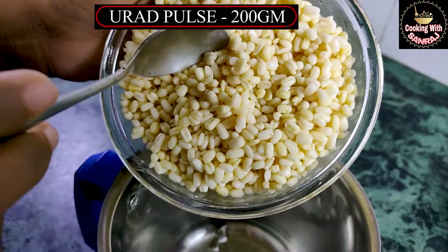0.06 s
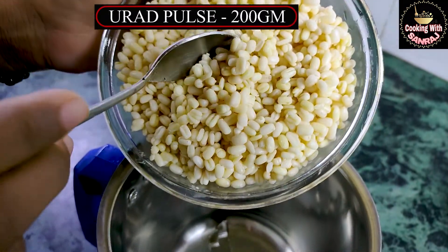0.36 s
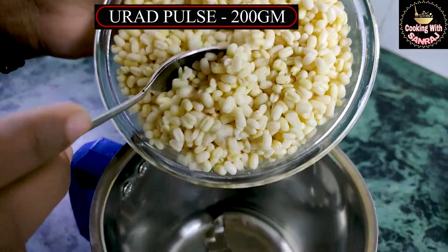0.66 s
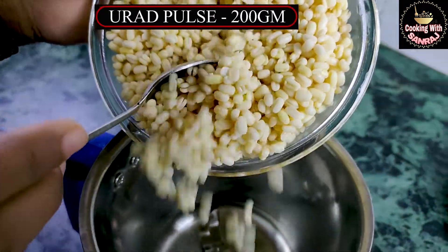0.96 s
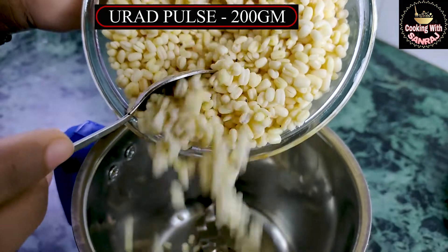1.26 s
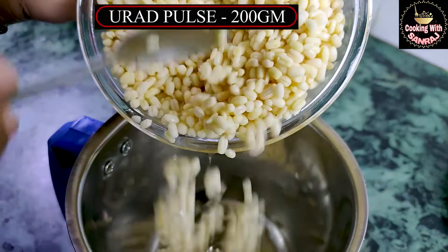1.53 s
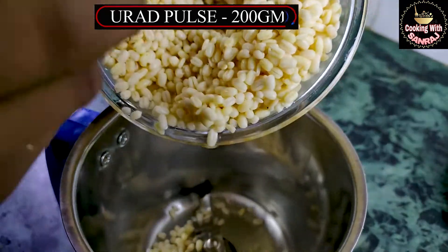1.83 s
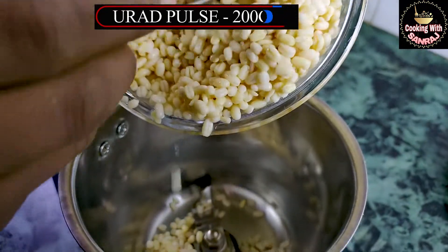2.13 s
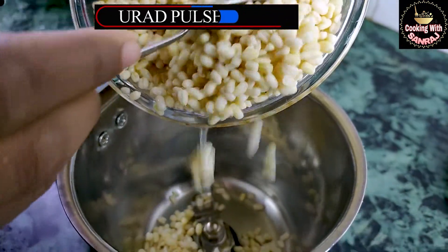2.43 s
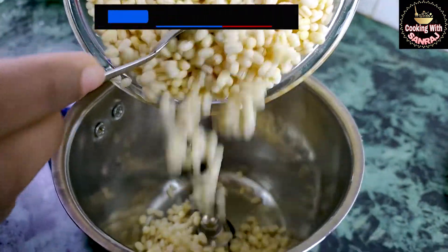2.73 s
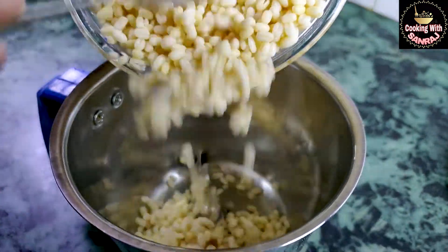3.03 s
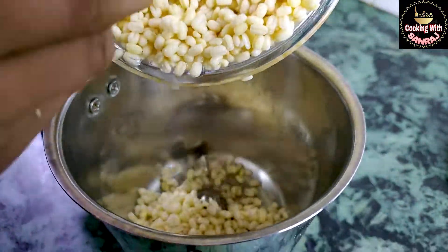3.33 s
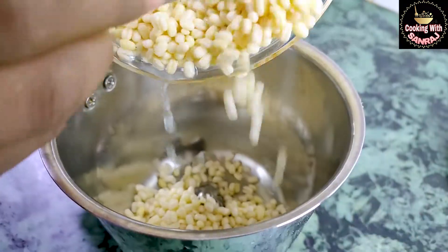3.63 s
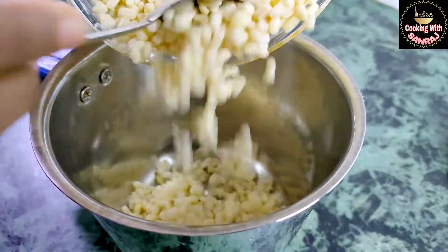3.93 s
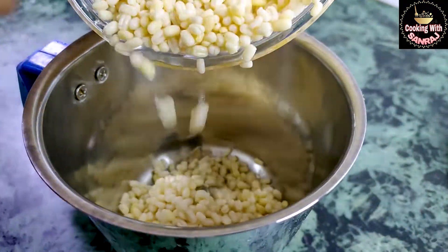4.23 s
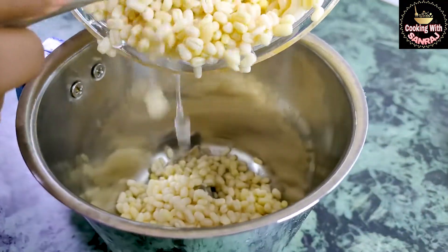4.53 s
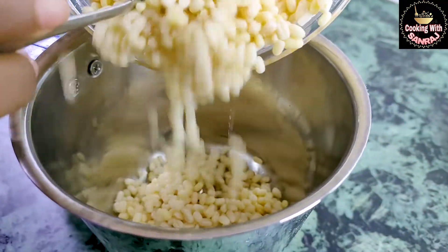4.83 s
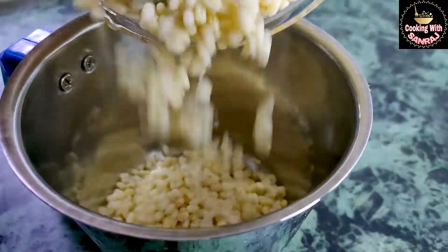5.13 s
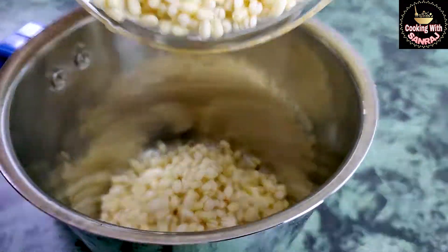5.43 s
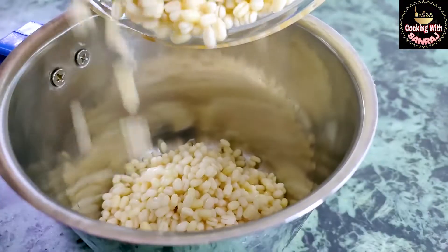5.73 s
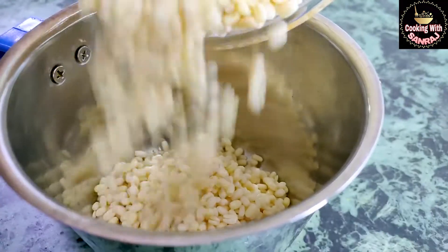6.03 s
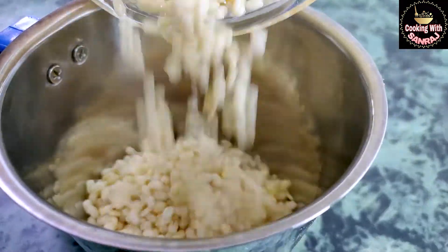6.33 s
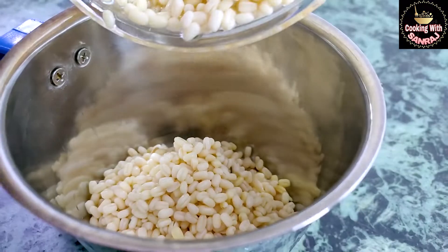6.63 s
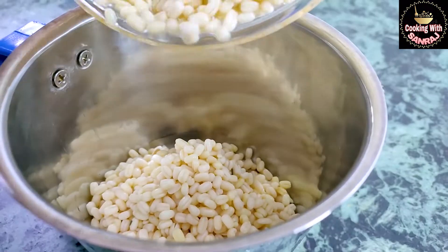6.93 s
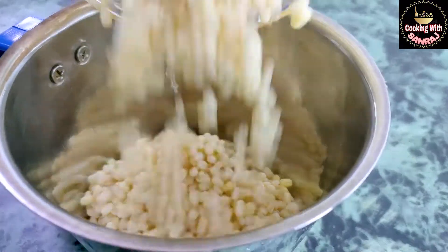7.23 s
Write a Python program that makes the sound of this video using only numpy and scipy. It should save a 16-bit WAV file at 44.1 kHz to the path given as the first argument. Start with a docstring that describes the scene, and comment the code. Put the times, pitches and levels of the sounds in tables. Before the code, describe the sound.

Heard close up in a small, quiet kitchen with a faint low hum, hands softly rub the vessels and bump a glass bowl. From about 0.9 to 1.7 seconds, wet lentils drop in clumps into a steel jar, pattering, ticking and pinging on the bare metal, with dull ringing knocks up to 2 seconds. A softer spoonful falls from 2.5 seconds. At 3.3 seconds a spoon clinks sharply on the bowl, the loudest sound, followed by a faint falling squeak. More short bursts of wet patter come around 4, 5 and 6 seconds, ringing less as the lentils land on a heap. Two firm, short knocks on the jar sound at 5.3 and 5.8 seconds. A softer clink comes at 6.5 seconds, then the bowl clacks on the jar's rim at 6.6. A last few lentils fall at about 7.2 seconds.

```python
"""Soaked lentils are spooned from a glass bowl into a steel grinder jar in a small, quiet kitchen.
Hands rub and shift the vessels and bump the bowl. From 0.9 s, spoonfuls trickle and drop in clumps,
pattering and pinging on bare steel; clumps and nudges knock the jar. From 1.5 to 4 s a heap covers the
floor and damps the ring. The spoon clinks on the bowl at 3.3 s; a faint squeak follows. More spoonfuls,
knocks and softer clinks come; at 6.6 s the bowl clacks on the jar's rim, then a last few lentils fall."""
import sys
import numpy as np
from scipy import signal
from scipy.fft import rfft, irfft, next_fast_len
from scipy.io import wavfile
from scipy.ndimage import uniform_filter1d

SR = 44100
rng = np.random.default_rng(int(sys.argv[2]) if len(sys.argv) > 2 else 0)


def dump(signal):
    """Clip the signal to [-1, 1] and save it as 16-bit WAV at the path in sys.argv[1]."""
    limited = np.clip(np.atleast_2d(signal).T, -1, 1)
    pcm = np.round(limited * 32767).astype(np.int16)
    wavfile.write(sys.argv[1], SR, pcm)


N = 320210
TIME_S = np.arange(N) / SR
RING_S = np.arange(SR // 2) / SR
TOP_HZ = 7800

# room noise spectrum: freq_hz, density_db
AIR_SPECTRUM = [(8, -11.5), (18, 5.5), (32, -9.5), (50, -15), (60, -8), (90, -28.5), (170, -19),
                (250, -26.5), (550, -24), (800, -35), (1300, -37.5), (1800, -44.5), (7500, -52.5),
                (10000, -67.5)]
# kitchen reverberation: freq_hz, t60_s
KITCHEN_DECAY = [(200, .25), (800, .23), (2600, .235), (5000, .19), (8000, .145)]
# hands and vessels rubbing: start_s, length_s, centre_hz, level_db
RUBS = [(0.0, 0.058, 540, -51.5), (0.0, 0.072, 1180, -56.5), (0.771, 0.19, 159, -57),
        (0.852, 0.24, 1075, -59), (1.038, 0.19, 19.8, -44.5), (1.536, 0.18, 485, -45.5),
        (1.558, 0.14, 187, -61), (1.709, 0.32, 1300, -64), (1.755, 0.25, 652, -61), (1.867, 0.25, 510, -54),
        (1.97, 0.17, 136.4, -62), (4.574, 0.13, 333, -61.5), (4.575, 0.17, 1042, -70),
        (4.716, 0.12, 480, -55.5), (4.859, 0.12, 4020, -66), (4.916, 0.14, 1015, -66.5),
        (5.52, 0.18, 317, -60.5)]
# hand on bowl: start_s, level_db
BUMPS = [(0.613, -45)]
# modes of that bump: pitch_hz, level_db, t60_s
BUMP_MODES = [(300, -15.5, 0.074), (494, 5, 0.024), (560, -1, 0.021), (618, -14.5, 0.094)]
# jar floor under lentils: time_s, covered_fraction
FLOOR_COVER = [(1.5, 0), (2.8, 0.76), (4.0, 1), (5.0, 1)]
# landing on bare steel: freq_hz, density_db
STEEL_SPECTRUM = [(300, -39.5), (520, -20), (680, 17), (800, -12), (900, -0.5), (1080, -9), (1750, -12.5),
                  (2020, 1.5), (2400, -4.5), (3000, -5.5), (3350, -10), (4500, -3), (6000, 2), (8000, -14)]
# landing on the heap: freq_hz, density_db
HEAP_SPECTRUM = [(300, -31.5), (550, -26), (770, -10), (1000, -19.5), (1400, -30.5), (1700, -15), (2020, 3),
                 (2250, -4.5), (2700, -2), (3050, -9.5), (3400, -26), (3750, -5.5), (4200, 6.5), (5300, 2),
                 (7300, 1), (8000, -10)]
# thin steel wall: pitch_hz, level_db, t60_s
WALL_MODES = [(2015, -6, .04), (3000, -5, .04), (4215, -4, .05), (4665, -4, .045), (5650, -5, .04),
              (6880, -6, .05), (7260, -6, .05), (7550, -6, .05)]
# loose lentils from each spoonful: start_s, end_s, patter_db, crackle_db
TRICKLES = [(1.07, 1.692, -60, -62), (2.673, 3.296, -72.5, -70), (3.83, 4.21, -73.5, -68),
            (4.867, 5.349, -67, -79.5), (5.771, 6.462, -70.5, -68.5), (7.193, 7.26, -66.5, -63)]
# clumps landing: peak_s, build_up_s, patter_db, crackle_db
CLUMPS = [(0.939, 0.0049, -52.5, -67.5), (1.069, 0.0082, -51, -58.5), (1.087, 0.0017, -48.5, -41.5),
          (1.134, .025, -49.5, -49.5), (1.153, .005, -47.5, -39), (1.283, 0.0039, -52, -51.5),
          (1.336, 0.013, -50.5, -51.5), (1.38, 0.023, -49, -51.5), (1.412, 0.032, -46.5, -50),
          (1.556, 0.0041, -46.5, -48), (1.615, 0.016, -45.5, -45), (2.54, 0.013, -65.5, -70.5),
          (2.67, 0.007, -61, -63.5), (2.70, 0.025, -53.5, -58), (2.77, 0.046, -61.5, -60.5),
          (2.885, .012, -65.5, -56.5), (3.03, 0.059, -61, -59.5), (3.086, 0.038, -61, -59),
          (3.186, 0.03, -56.5, -52.5), (3.305, 0.017, -54, -55), (3.836, 0.011, -67.5, -60.5),
          (3.945, 0.029, -54, -60), (4.053, 0.0045, -61.5, -61), (4.176, 0.0068, -75.5, -60),
          (4.315, 0.007, -74, -103), (4.405, .012, -88, -80), (4.819, 0.014, -70, -69),
          (4.866, 0.0043, -60.5, -90), (5.105, 0.0077, -83, -53), (5.122, 0.0056, -54.5, -55.5),
          (5.15, .004, -68, -55.5), (5.282, 0.025, -57.5, -53), (5.33, 0.03, -55, -53),
          (5.404, .004, -98, -63.5), (5.839, .005, -58.5, -63), (5.955, 0.0091, -58.5, -49.5),
          (6.075, 0.014, -89, -53), (6.176, 0.03, -64, -56), (6.215, 0.0078, -69, -55.5),
          (6.308, .004, -75, -48.5), (6.345, 0.011, -56.5, -49.5), (7.21, 0.021, -68, -58),
          (7.255, 0.0014, -58.5, -39.5)]
# single hard landings: start_s, level_db
TICKS = [(0.9372, -26), (1.0859, -25), (1.1513, -18.5), (1.189, -29), (1.2819, -25), (1.3573, -34),
         (1.5461, -26), (2.7, -40.5), (2.8798, -39.5), (3.2573, -37), (3.8344, -37.5), (4.0008, -41),
         (6.0203, -41.5), (6.303, -42), (6.34, -30), (7.1941, -40)]
# lentils striking bare steel: start_s, level_db, pitch_hz, t60_s
PINGS = [(0.942, -57, 5720, 0.033), (1.066, -40, 5630, 0.032), (1.374, -42, 5670, 0.049),
         (1.66, -58, 4187, 0.18), (6.215, -50, 4214, 0.086), (6.34, -45.5, 4610, 0.14)]
# dull blows on the jar: start_s, level_db, focus_hz, cutoff_hz
KNOCKS = [(0.946, -36, 684, 830), (1.064, -37.5, 706, 850), (1.29, -52.5, 690, 900),
          (1.372, -36.5, 654, 784), (1.405, -32.5, 645, 910), (1.61, -30, 680, 1026),
          (1.761, -47, 847, 1203), (1.923, -30.5, 610, 1670), (1.957, -41, 632, 1656),
          (2.54, -52.5, 880, 1220), (2.696, -42, 760, 1200), (2.766, -30.5, 1307, 2190),
          (2.805, -40, 1120, 1900), (3.184, -23.5, 566, 1620), (3.394, -31, 896, 1410),
          (3.564, -38, 800, 880), (3.861, -49, 893, 940), (3.942, -43, 646, 915), (4.051, -42, 880, 955),
          (5.3225, -15, 777, 894), (5.8329, -18, 798, 900), (6.482, -42, 790, 752)]
# gentler blows build more slowly: level_db, attack_s
KNOCK_ATTACK = [(-53, 0.01), (-32.5, .002), (-18.5, 0.00068)]
# steel jar: pitch_hz, level_db, t60_s
JAR_MODES = [(662, -1, .12), (709, 0, .13), (765, -1, .13), (808, -10, .13), (895, 1, .1), (945, -6, .05),
             (1117, -6, .07), (1245, -2, .05), (1370, -7, .045), (2015, -9, .06)]
# spoon on bowl: start_s, level_db, low_hz, cutoff_hz
CLINKS = [(3.315, -1.5, 682, 8967), (5.148, -31.5, 2010, 3170), (6.4784, -21, 2110, 2990)]
# glass bowl, spoon against it: pitch_hz, level_db
BOWL_MODES = [(1000, -23.5), (1330, -15.5), (1750, -18.5), (2000, -15.5), (2250, -16), (2420, -9),
              (2590, -7), (2670, -3), (2760, -8), (2885, -9), (3175, -14), (3460, -16.5), (4050, -8.5),
              (4730, -12), (4905, -1.5), (5005, -0.5), (5168, -13), (5450, -12.5), (6350, -18.5),
              (7500, -16)]
# squeak contour: time_s, pitch_hz, level_db
SQUEAK_PATH = [(3.589, 2870, -82), (3.631, 2790, -67.5), (3.688, 2600, -59.5), (3.76, 2650, -67.5),
               (3.82, 2480, -84)]
# bowl on jar rim: start_s, level_db
CLACKS = [(6.6222, -19)]
# jar rim: pitch_hz, level_db
RIM_MODES = [(760, 0.5), (1110, 0), (1350, 6), (1520, 1), (2050, -1), (2340, 0.5), (2590, -19), (3870, -23),
             (4090, 4), (4830, 1.5), (5430, 2.5), (6400, -8.5), (6780, -1), (7080, 2)]


def amp(db):
    """Decibels to gain."""
    return 10 ** (np.asarray(db) / 20)


def unit_rms(x):
    """Scale to rms 1."""
    return x / np.sqrt(np.mean(x ** 2) + 1e-20)


def curve_at(points, hz):
    """Interpolate (freq_hz, value) points on a log axis."""
    freq_hz, values = np.transpose(points)
    return np.interp(np.log(hz + 1), np.log(freq_hz), values)


def filtered(x, response):
    """Apply the gain response(hz)."""
    size = next_fast_len(len(x) + SR // 2)
    return irfft(rfft(x, size) * response(np.fft.rfftfreq(size, 1 / SR)), size)[:len(x)]


def butter(x, order, edge_hz, kind):
    """Butterworth filter."""
    return signal.sosfilt(signal.butter(order, edge_hz, kind, fs=SR, output="sos"), x)


def add(track, start_s, sound):
    """Mix a sound into the track."""
    part = track[max(round(start_s * SR), 0):][:len(sound)]
    part += sound[:len(part)]


def ring(modes, attack_s, weights=1, scatter_db=1):
    """Damped modes at slightly random strengths; peak 1."""
    hz, db, t60_s = np.transpose(modes)
    gains = weights * amp(db + scatter_db * rng.standard_normal(len(hz)))
    partials = np.sin(2 * np.pi * hz[:, None] * RING_S) * amp(-60 * RING_S / t60_s[:, None])
    sound = (gains @ partials) * (1 - np.exp(-RING_S / attack_s))
    return sound / np.abs(sound).max()


def crack(t60_s):
    """Burst of contact noise."""
    return rng.standard_normal(len(RING_S)) * amp(-60 * RING_S / t60_s)


def low_cut(x, low_hz):
    """Steep high-pass; knocks and clinks have almost no bass."""
    return butter(x, 10, low_hz, "high")


def in_kitchen(sound, wet_db, build_up_s=0.0028):
    """Short sound plus a fresh tail of reflections; treble dies first."""
    hz, time_s, bins = signal.stft(rng.standard_normal(SR // 2), SR, nperseg=256)
    decay = amp(-60 * time_s / curve_at(KITCHEN_DECAY, hz)[:, None])
    tail = signal.istft(bins * decay, SR, nperseg=256)[1][:SR // 2]
    tail *= 1 - np.exp(-(RING_S / build_up_s) ** 2)
    echo = signal.fftconvolve(sound, tail)
    echo *= amp(wet_db) * np.linalg.norm(sound) / (np.linalg.norm(echo) + 1e-20)
    add(echo, 0, sound)
    return echo


def room_air(level_db=-67):
    """Low rumble and faint hiss."""
    noise = filtered(rng.standard_normal(N), lambda hz: amp(curve_at(AIR_SPECTRUM, hz)))
    return amp(level_db) * unit_rms(noise)


def hand_rubs(rise_fraction=0.17, relative_width=0.29):
    """Friction noise in one resonance; swells quickly, dies away."""
    track = np.zeros(N)
    for start_s, length_s, centre_hz, db in RUBS:
        age = np.arange(SR) / SR / (length_s * rise_fraction)
        noise = rng.standard_normal(SR)
        band = filtered(noise, lambda hz: 1 / (1 + (2 * (hz / centre_hz - 1) / relative_width) ** 4))
        add(track, start_s, amp(db) * unit_rms(band) * age * np.exp(1 - age))
    return track


def hand_bump():
    """A soft hand excites low modes of the bowl."""
    track = np.zeros(N)
    for start_s, db in BUMPS:
        thump = low_cut(ring(BUMP_MODES, attack_s=0.0088), low_hz=221)
        add(track, start_s, amp(db) * in_kitchen(thump, wet_db=-9.5))
    return track


def covered(time_s):
    """Fraction of the jar floor under lentils."""
    return np.clip(np.interp(time_s, *np.transpose(FLOOR_COVER)), 0, 1)


def impulse(spectrum, size=2048):
    """Minimum-phase click with this spectrum; energy 1."""
    cepstrum = irfft(np.log(amp(curve_at(spectrum, np.fft.rfftfreq(size, 1 / SR)))))
    cepstrum[1:size // 2] *= 2
    cepstrum[size // 2 + 1:] = 0
    click = irfft(np.exp(rfft(cepstrum)))
    return click / np.linalg.norm(click)


def landing(blows, steel_ping_db=-11, heap_ping_db=-16):
    """Each blow rings the wall; the colour shifts from bare steel to heap as the floor fills."""
    ping = ring(WALL_MODES, attack_s=.0005)
    ringing = signal.fftconvolve(blows, ping / np.linalg.norm(ping))[:N]
    steel = signal.fftconvolve(blows + amp(steel_ping_db) * ringing, impulse(STEEL_SPECTRUM))[:N]
    heap = signal.fftconvolve(blows + amp(heap_ping_db) * ringing, impulse(HEAP_SPECTRUM))[:N]
    cover = covered(TIME_S)
    return np.sqrt(1 - cover) * steel + np.sqrt(cover) * heap


def wet_pops(rate_per_s=1500, spread_db=4.5, median_decay_s=.0004, size=300):
    """Stream of tiny damped sines, random in pitch, force and decay."""
    onset, pitch, force, span, phase = rng.random((int(rate_per_s * N / SR), 5)).T[:, :, None]
    age_s = np.arange(size) / SR
    hz = 400 + 8200 * pitch
    strength = amp(spread_db * np.minimum(-np.log(1 - force), 3))
    decay_s = median_decay_s * 2 ** (2 * span - 1)
    pops = strength * np.sin(2 * np.pi * (hz * age_s + phase)) * np.exp(-age_s / decay_s)
    samples = (onset * N).astype(int) + np.arange(size)
    return np.bincount(samples.ravel(), pops.ravel(), N)[:N]


def flow_gains(rise_s=0.03, fade_db_per_s=210.5, settle_db_per_s=289.5):
    """Patter and crackle gains: trickles hold and fade, clumps build and settle; powers add."""
    power = np.zeros((2, N))
    for start_s, end_s, *levels_db in TRICKLES:
        rise = np.clip((TIME_S - start_s) / rise_s, 0, 1)
        fade = amp(-fade_db_per_s * np.maximum(TIME_S - end_s, 0))
        power += np.outer(amp(levels_db), rise * fade) ** 2
    offset_s = RING_S - RING_S[-1] / 2
    settle = amp(-settle_db_per_s * np.maximum(offset_s, 0))
    for peak_s, build_up_s, *levels_db in CLUMPS:
        build = np.exp(-(np.minimum(offset_s, 0) / build_up_s) ** 2)
        for band, db in zip(power, levels_db):
            add(band, peak_s + offset_s[0], (amp(db) * build * settle) ** 2)
    return np.sqrt(power)


def levelled(x, guide):
    """Divide by the guide's running rms."""
    return x / np.sqrt(np.abs(uniform_filter1d(guide ** 2, SR // 12)) + 1e-12)


def lentil_patter(split_hz=3500):
    """Wet lentils land as dense pops: patter below the split, crackle above, both scaled by the flow."""
    pops = wet_pops()
    blows = np.zeros(N)
    block = SR // 8
    for start in range(0, N, block):
        add(blows, start / SR, in_kitchen(pops[start:start + block], wet_db=-2))
    rustle = landing(blows)
    patter = filtered(rustle, lambda hz: 1 / (1 + (hz / split_hz) ** 24))
    upper_patter = filtered(patter, lambda hz: hz > 1800)
    crackle = rustle - patter
    patter_gain, crackle_gain = flow_gains()
    return patter_gain * levelled(patter, upper_patter) + crackle_gain * levelled(crackle, crackle)


def lentil_ticks(trim_db=-8, low_hz=2200):
    """A hard landing is a tiny bright splat."""
    blows = np.zeros(N)
    for start_s, db in TICKS:
        add(blows, start_s, amp(db + trim_db) * in_kitchen(crack(t60_s=.018), wet_db=-3))
    return butter(landing(blows), 1, low_hz, "high")


def wall_pings():
    """A lentil on bare steel rings one wall mode."""
    track = np.zeros(N)
    for start_s, db, hz, t60_s in PINGS:
        ping = ring([(hz, 0, t60_s)], attack_s=0.00034)
        add(track, start_s, amp(db) * in_kitchen(ping, wet_db=-3))
    return track


def jar_knocks(focus_db=7, focus_width_hz=70, thud_db=-12, damping_db_per_s=149):
    """Jar ring plus wet thud. The strike point favours some modes; the heap damps the ring."""
    track = np.zeros(N)
    mode_hz = np.transpose(JAR_MODES)[0]
    for start_s, db, focus_hz, cutoff_hz in KNOCKS:
        cover = covered(start_s)
        soft_contact = 1 / np.sqrt(1 + (mode_hz / cutoff_hz) ** 10)
        focus = amp(focus_db * np.exp(-((mode_hz - focus_hz) / focus_width_hz) ** 2))
        thud = butter(crack(t60_s=0.006), 3, [720, max(cutoff_hz, 950)], "band")
        attack_s = np.interp(db, *np.transpose(KNOCK_ATTACK))
        tone = ring(JAR_MODES, attack_s, weights=soft_contact * focus)
        tone *= amp(-damping_db_per_s * cover * RING_S)
        low_hz = 570 + 110 * cover  # the lowest mode weakens as the floor fills
        knock = low_cut(tone + amp(thud_db) * thud / np.abs(thud).max(), low_hz)
        add(track, start_s, amp(db) * in_kitchen(knock, wet_db=-5))
    return track


def hard_hit(modes, cutoff_hz, t60_s, crack_db, low_hz):
    """Short ring plus crack, low-passed by the contact."""
    tone = ring([(hz, db, t60_s) for hz, db in modes], attack_s=.0002)
    hit = low_cut(tone + amp(crack_db) * crack(t60_s=.016), low_hz)
    return butter(hit, 8, cutoff_hz, "low")


def spoon_clinks():
    """The spoon strikes the glass bowl, which rings briefly."""
    track = np.zeros(N)
    for start_s, db, low_hz, cutoff_hz in CLINKS:
        clink = hard_hit(BOWL_MODES, cutoff_hz, t60_s=.026, crack_db=-15.5, low_hz=low_hz)
        add(track, start_s, amp(db) * in_kitchen(clink, wet_db=-5))
    return track


def squeak(width_hz=110):
    """Faint falling tone, blurred by noise modulation."""
    time_s, pitch_hz, db = np.transpose(SQUEAK_PATH)
    flutter = unit_rms(filtered(rng.standard_normal(N), lambda hz: 1 / (1 + (hz / width_hz) ** 2)))
    tone = np.sin(2 * np.pi * np.cumsum(np.interp(TIME_S, time_s, pitch_hz)) / SR)
    return unit_rms(flutter * tone) * amp(np.interp(TIME_S, time_s, db, left=-120, right=-120))


def rim_clack():
    """The bowl strikes the jar's rim; the ring dies fast."""
    track = np.zeros(N)
    for start_s, db in CLACKS:
        clack = hard_hit(RIM_MODES, TOP_HZ, t60_s=.018, crack_db=-21, low_hz=680)
        add(track, start_s, amp(db) * in_kitchen(clack, wet_db=-6))
    return track


def scene():
    """All sources, close up, mono."""
    lentils = lentil_patter() + lentil_ticks() + wall_pings()
    vessels = jar_knocks() + spoon_clinks() + rim_clack()
    hands = hand_bump() + hand_rubs()
    return (lentils + vessels + hands + squeak() + room_air())[None]


def record(dry, knee=.62):
    """Soft peak limit, then steep low-pass."""
    rounded = dry / (1 + (dry / knee) ** 4) ** .25
    return signal.sosfilt(signal.cheby1(14, .1, TOP_HZ, fs=SR, output="sos"), rounded)


dry = scene()
out = record(dry)
dump(out)
```